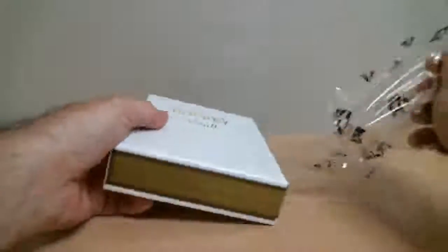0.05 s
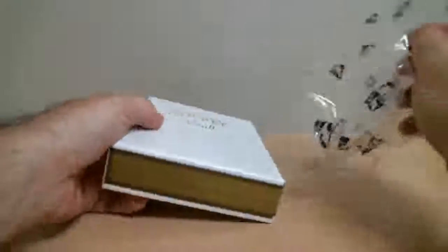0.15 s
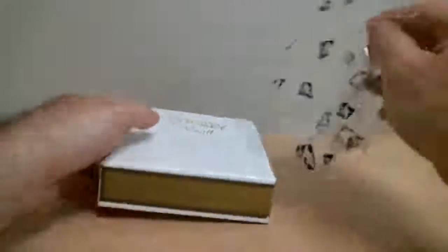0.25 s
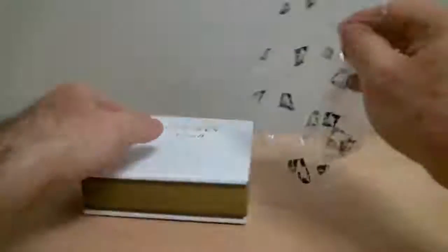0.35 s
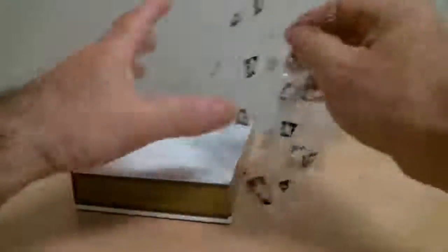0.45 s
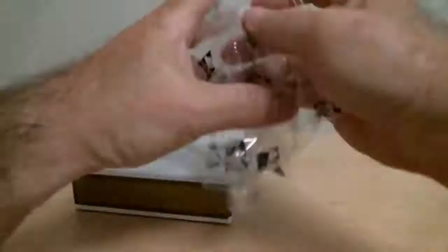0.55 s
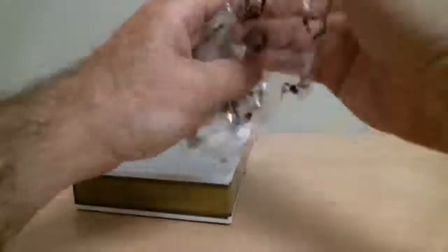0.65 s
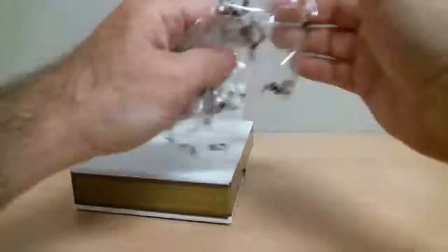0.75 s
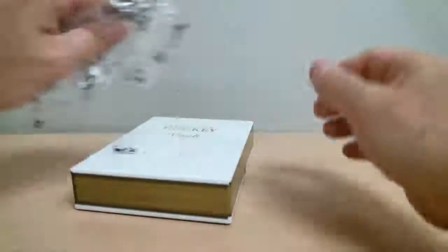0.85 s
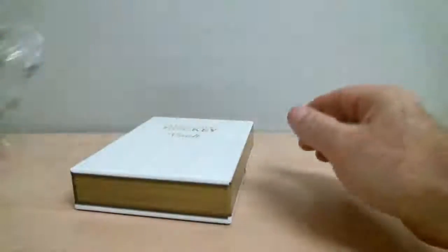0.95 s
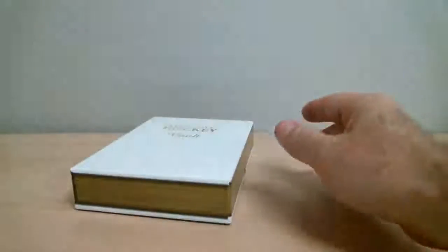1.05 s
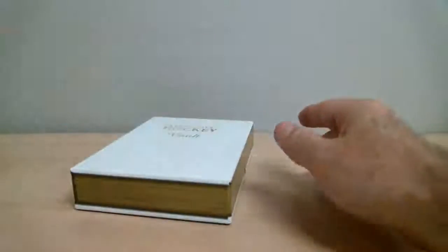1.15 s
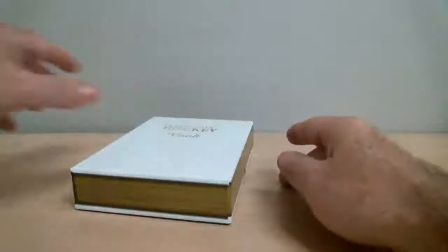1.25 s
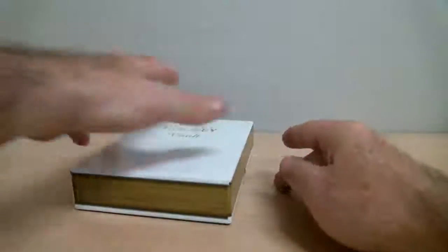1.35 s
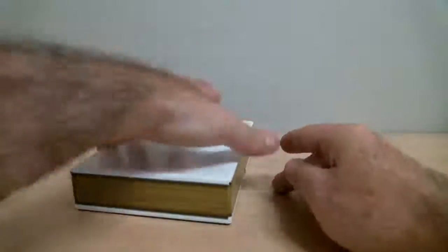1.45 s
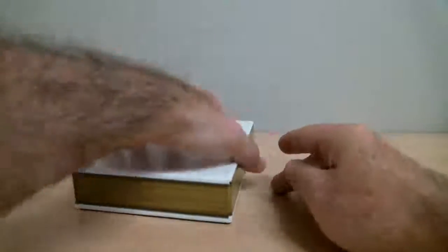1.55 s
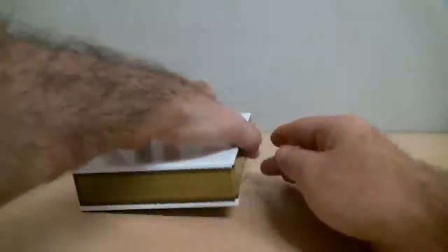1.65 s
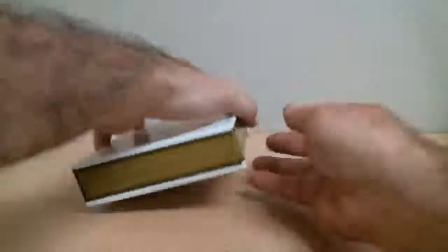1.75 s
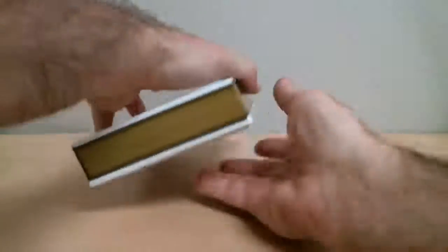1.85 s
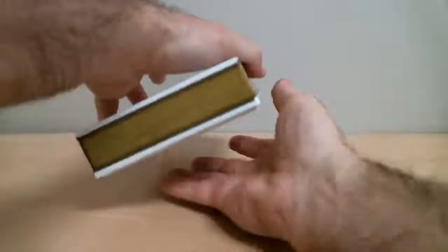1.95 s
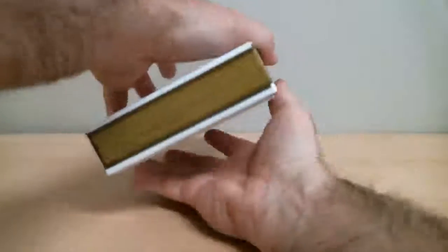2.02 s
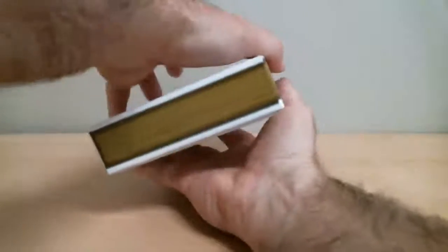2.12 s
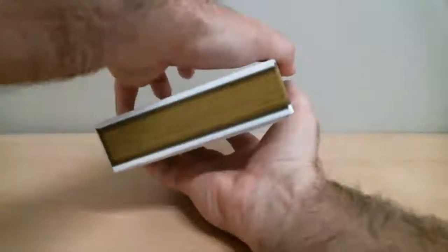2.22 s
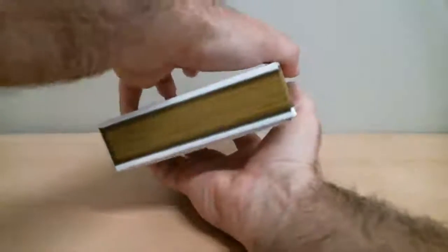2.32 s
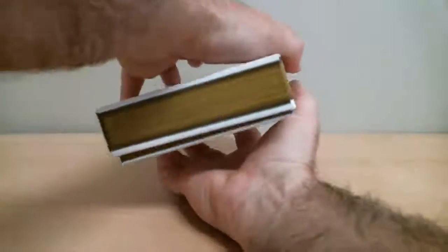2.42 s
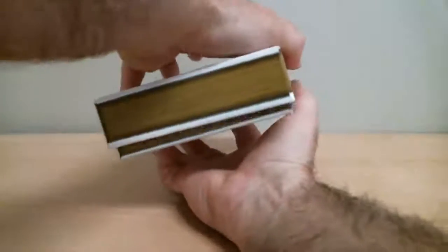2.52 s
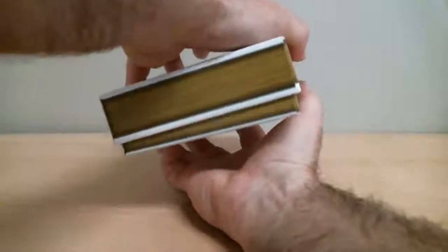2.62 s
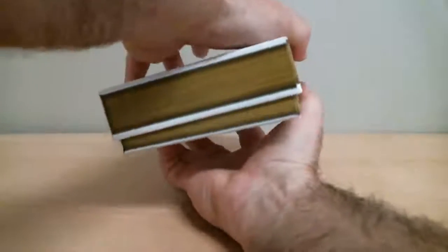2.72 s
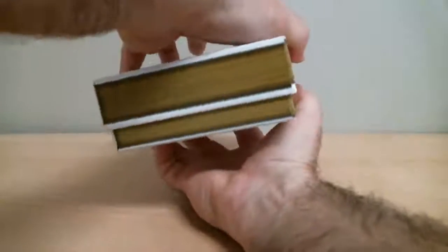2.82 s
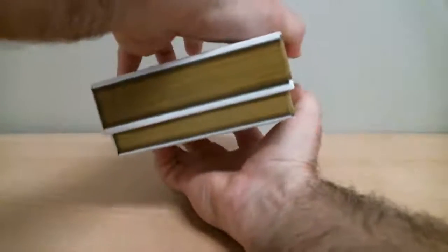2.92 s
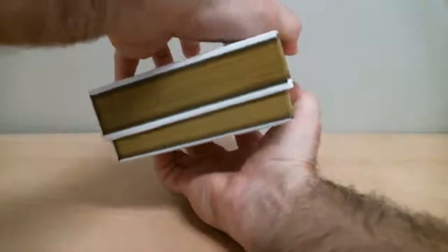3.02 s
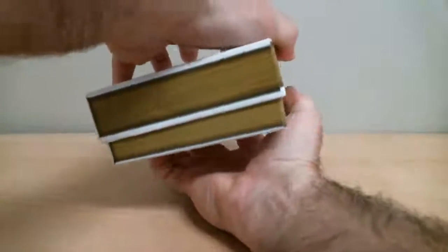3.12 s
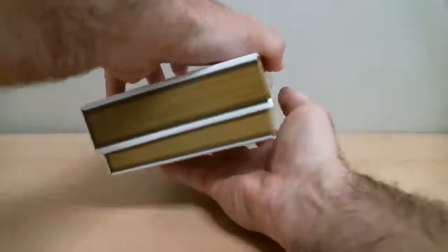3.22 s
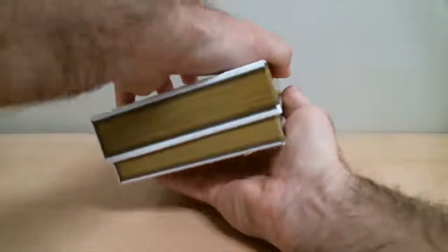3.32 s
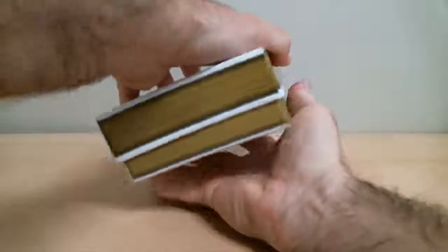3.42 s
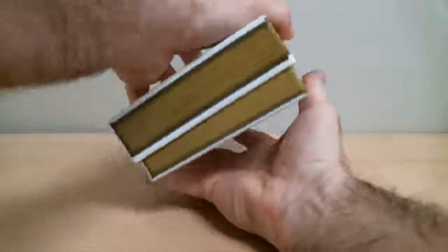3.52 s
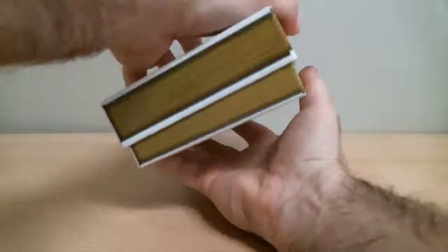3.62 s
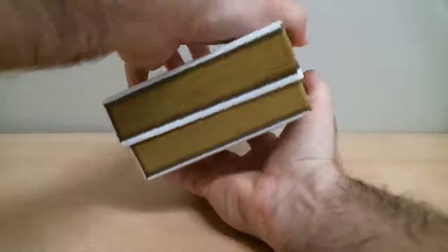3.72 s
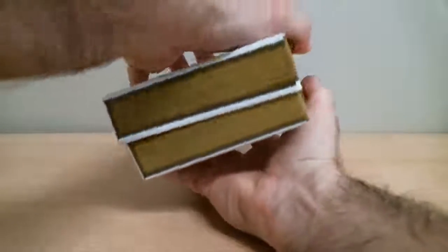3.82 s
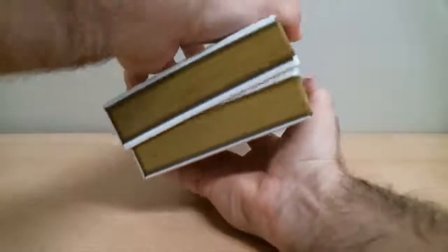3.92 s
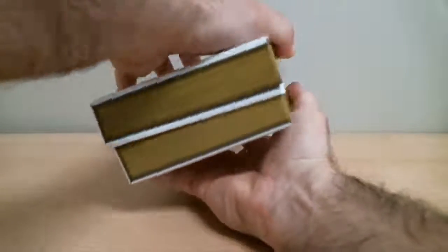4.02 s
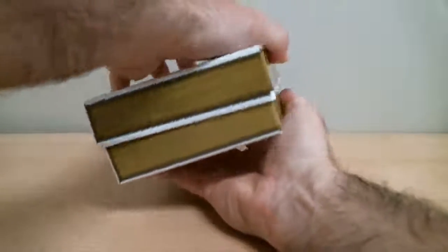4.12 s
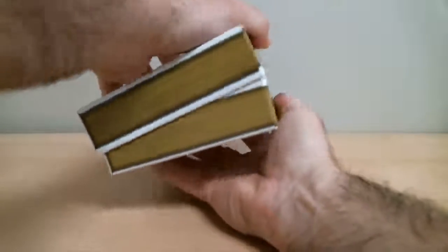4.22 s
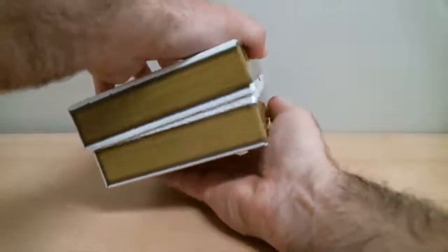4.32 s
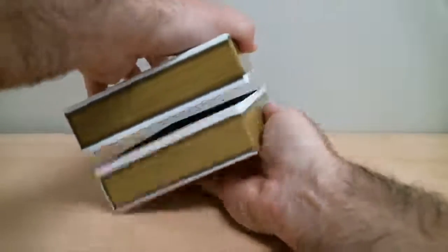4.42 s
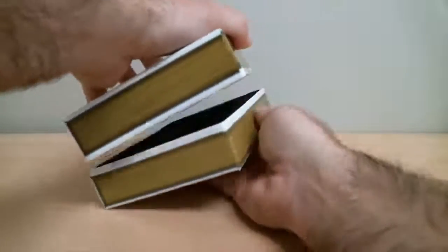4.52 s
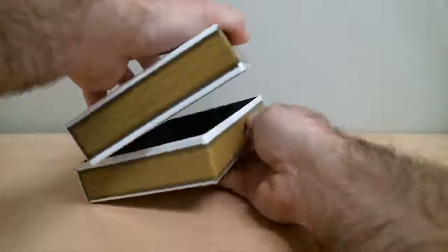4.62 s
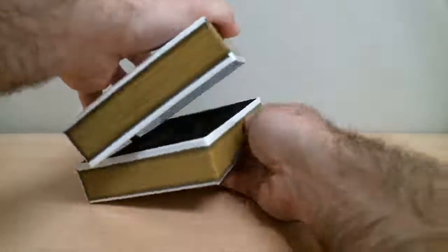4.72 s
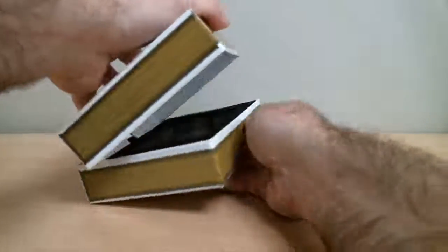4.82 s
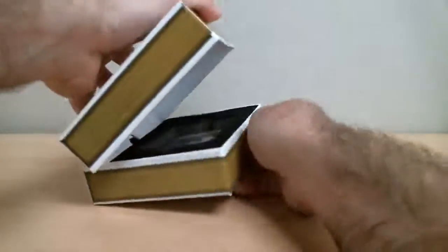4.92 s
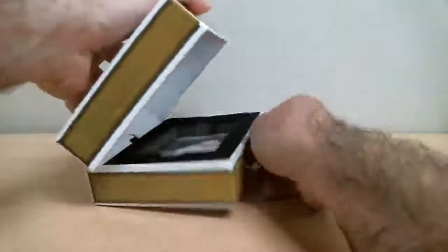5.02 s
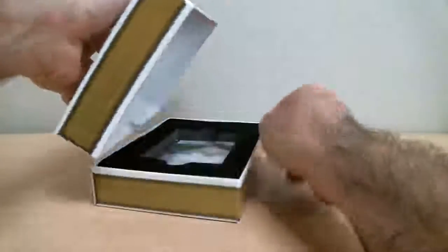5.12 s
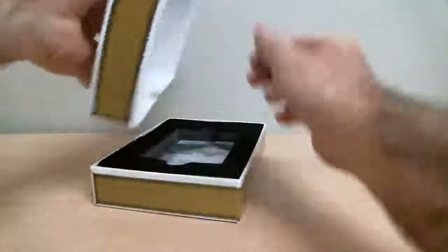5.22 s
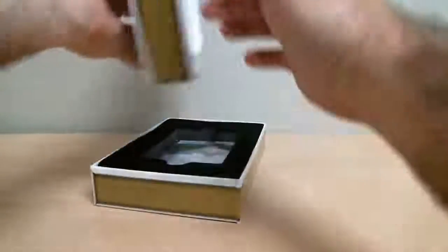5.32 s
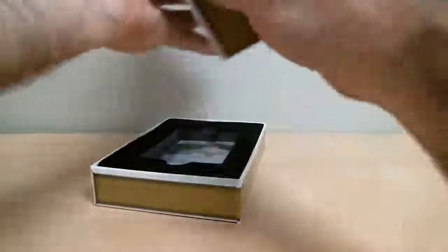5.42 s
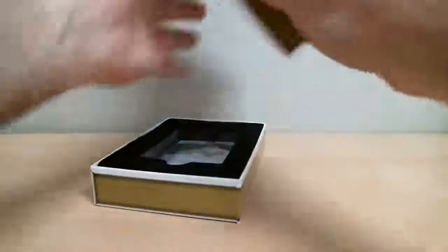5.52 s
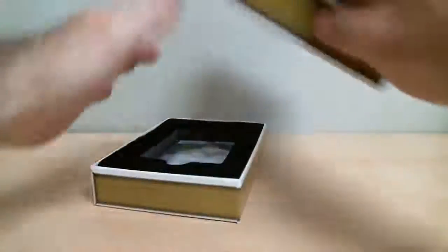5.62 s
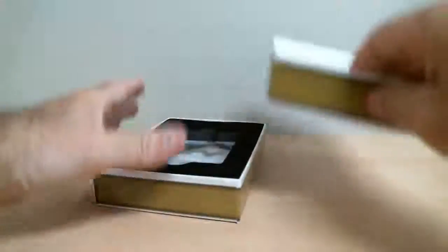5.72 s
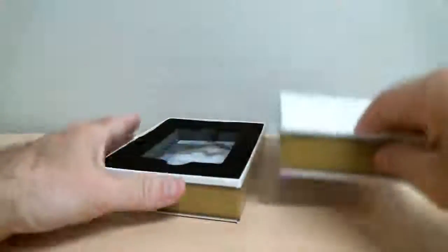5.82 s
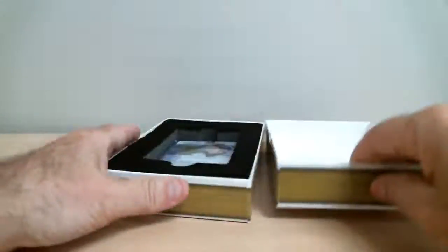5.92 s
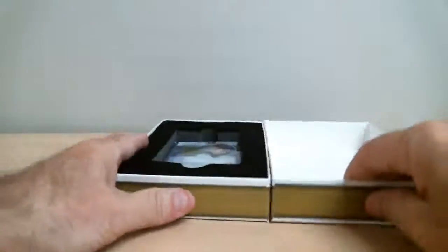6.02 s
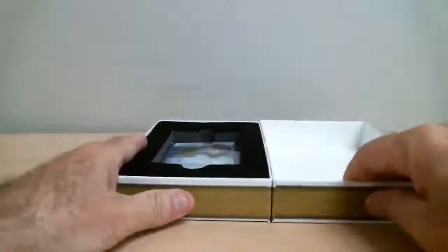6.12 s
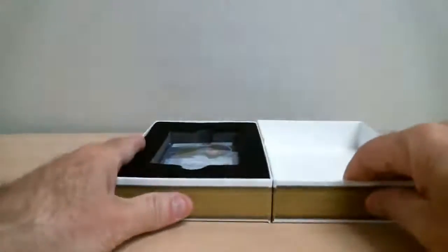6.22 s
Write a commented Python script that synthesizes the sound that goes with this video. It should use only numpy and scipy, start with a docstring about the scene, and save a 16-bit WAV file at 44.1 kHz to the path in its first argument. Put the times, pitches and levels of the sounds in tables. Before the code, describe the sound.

A stiff cardboard box knocks loudly on a wooden table at the start and again at 0.3 seconds. From about 0.5 to 0.7 seconds hands crumple thin plastic wrap with sharp snaps, and it settles in small crackles until just after 1 second. After a lull, soft brushes of skin, low creaks and short scrapes of card on card begin around 1.7 seconds. The lid sticks and slips with small ticks, growing louder from 3.7 seconds, with a cluster of sharp knocks and scrapes between 4.2 and 4.7 seconds. The box knocks down at 5 seconds, a few light ticks follow, and the lid lands with quick knocks and a scrape around 5.9 to 6 seconds. The microphone is close and overloads on the loudest knocks. Faint room air and an appliance hum continue underneath.

```python
"""A stiff cardboard box knocks down on a wooden table, close to one microphone in a room. Hands crumple
its thin plastic wrap, then slide the lid off. Knocks ring the box and table top, the film buckles in
snaps, card sticks and slips on card. Air noise and an appliance's hum lie behind it all, and the
loudest knocks overload the microphone."""
import sys
import numpy as np
from scipy import signal
from scipy.io import wavfile
from scipy.ndimage import uniform_filter1d

SR = 44100
rng = np.random.default_rng(int(sys.argv[2]) if len(sys.argv) > 2 else 0)


def master(y):
    """Save y as 16-bit WAV."""
    cut = np.clip(np.atleast_2d(y).T, -1, 1)
    pcm = np.round(cut * 32767)  # scale
    wavfile.write(sys.argv[1], SR, pcm.astype(np.int16))


N = 276066
T = np.arange(N) / SR

# box against table or lid, crack and thud relative to the blow: start_s, blow_db, crack_db, thud_db
KNOCKS = [(0.0425, 0.5, -6, -21), (0.0559, 4, -28.5, -20.5), (0.313, 7, 1.5, -14), (3.67, -26, 2.5, -62),
          (3.857, -18.5, -8, -35.5), (3.991, -27, -32, -9.5), (4.2, -14, -28.5, -27),
          (4.2243, -14, -3, -26), (4.381, 2, -4, -31.5), (4.422, 8.5, 1.5, -39), (4.446, 2.5, -7, -35),
          (4.465, -9.5, -13, -53.5), (4.553, -15.5, -8, -51), (4.585, -12, -11.5, -34),
          (4.612, -16, -9.5, -37), (5.04, -4, -10.5, -13), (5.044, -8.5, 4.5, -20),
          (5.885, -15.5, -8.5, -16), (5.894, -11, 8, -21), (5.929, -10, -1, -30), (6.012, -28, 6.5, -39.5),
          (6.024, -24, -1.5, -48), (6.034, -22, 1, -43)]
# modes of box and table top: pitch_hz, level_db, t60_s
BOX_MODES = [(121, -21.5, 0.28), (155, -13, 0.44), (212.25, -8.5, 0.071), (300.5, -2, 0.16),
             (389.3, 5, 0.16), (821.5, 0.5, 0.055), (852.3, 6, 0.038), (1497, -9.5, 0.089),
             (1860, -5.5, 0.034), (2370, -9.5, 0.015)]
# the table top's many close modes, blurred into a noisy tail: centre_hz, level_db, t60_s
TABLE_TAIL = [(186, 1.5, 0.15), (374, 2, 0.42), (734, 0, 0.33), (1483.5, -1.5, 0.4), (2750, -14, 0.33),
              (5450, -24, 0.12), (8720, -30.5, 0.12)]
# the walls' ring moves with the grip and with how far the lid is off: time_s, pitch_hz
WALL_RING = [(0.04, 864), (0.32, 833), (2.3, 778), (2.55, 823), (2.75, 753), (3.19, 953), (3.67, 914),
             (3.73, 766), (3.85, 918), (3.98, 857), (4.2, 720), (4.28, 640), (4.38, 945), (4.42, 835),
             (5.04, 829), (5.89, 966), (6.05, 802)]
# spectrum of the room's air: frequency_hz, relative_db
AIR_TONE = [(18, -42), (30, -10.5), (205, -12), (404, -8), (662, -19.5), (735, -27), (815, -17),
            (1060, -21.5), (1560, -20.5), (2630, -35.5), (2990, -29), (15000, -44)]
# partials of the appliance: pitch_hz, level_db
HUM = [(118.4, -67), (199.2, -70), (290.7, -69.5), (355.3, -66.5), (538.3, -78), (829.0, -74.5)]
# film stirred, squeezed, let go, then settling in two small rustles: time_s, level_db
FILM_LEVELS = [(0, -58), (0.06, -55), (0.3, -65), (0.315, -64), (0.445, -57.5), (0.475, -35), (0.486, -23),
               (0.695, -21), (0.722, -48.5), (0.74, -55), (0.905, -55.5), (0.925, -51), (0.97, -36.5),
               (0.995, -57), (1.045, -42), (1.075, -56.5), (1.15, -70.5), (2.3, -75.5)]
# spectrum of the film's crackle: frequency_hz, relative_db
FILM_TONE = [(2500, 2.5), (4300, 0), (7000, -2), (10900, -1.5), (13500, -21.5)]
# skin brushing over the coating: start_s, length_s, level_db
BRUSHES = [(0.201, 0.038, -37.5), (1.848, 0.063, -65), (2.309, 0.036, -55.5), (2.514, 0.074, -57.5),
           (3.087, 0.12, -52.5), (3.406, 0.072, -56.5), (4.09, 0.046, -57.5), (4.74, 0.063, -63.5),
           (4.816, 0.15, -55.5), (5.269, 0.052, -56)]
# hiss of the rubbed coating: centre_hz, width_hz, relative_db
COATING_HISS = [(5500, 2100, 1), (7930, 2200, 12), (10000, 5700, 6.3)]
# single sharp buckles of film and ticks of fingernails: start_s, level_db, centre_hz
SNAPS = [(0.5065, -19, 3660), (0.5331, 5.5, 3970), (0.55, -0.5, 6280), (0.5597, -9, 9700),
         (0.6418, -2.5, 6400), (0.6388, 1, 3400), (0.6758, -5.5, 4000), (0.6854, -7.5, 9300),
         (0.744, -28, 3300), (0.758, -35, 7800), (0.77, -30, 3310), (0.794, -31, 8800),
         (0.834, -29.5, 3720), (0.868, -33.5, 7300), (0.9281, -18, 8050), (0.9444, -20, 9800),
         (2.682, -34, 3150), (2.769, -34, 3120), (3.187, -27, 1890), (3.388, -33, 3220),
         (3.6727, -27.5, 1860), (3.78, -26.5, 2100), (4.929, -45.5, 2200), (5.384, -33, 3130),
         (5.3907, -20, 3140), (5.438, -34.5, 2940)]
# creaks of the released film: start_s, length_s, level_db, ring_hz
CREAKS = [(0.733, 0.054, -45, 3320), (0.834, 0.017, -44.5, 3910)]
# card sliding on card: start_s, length_s, level_db, roughness_db, scratch_hz
STROKES = [(1.298, 0.04, -69.5, 11, 4630), (1.639, 0.05, -65, 11.5, 1520), (1.712, 0.055, -49, -13.5, 2010),
           (2.06, 0.04, -54.5, -10.5, 2600), (2.257, 0.061, -52.5, -12, 3120),
           (2.295, 0.088, -45, -16.5, 1470), (2.388, 0.079, -56, -27, 1420), (2.499, 0.12, -42, -8.5, 2210),
           (2.672, 0.047, -40.5, -9, 3100), (2.722, 0.047, -47.5, -26, 1830),
           (2.771, 0.046, -46.5, -6, 1920), (2.809, 0.065, -47.5, -15.5, 3040),
           (2.92, 0.045, -53, -6.5, 1845), (3.172, 0.036, -47.5, -1.5, 2460),
           (3.389, 0.052, -58.5, -1, 1360), (3.658, 0.038, -36, 0.5, 3180),
           (3.707, 0.057, -41.5, -9.5, 2050), (3.777, 0.018, -44.5, -9, 3040),
           (3.826, 0.044, -35.5, 0, 2880), (3.868, 0.047, -36, -7.5, 2880), (3.923, 0.028, -59, 10, 2130),
           (3.942, 0.056, -34.5, 1, 2300), (4.137, 0.053, -39.5, 8.5, 2490),
           (4.196, 0.057, -28.5, -11, 2850), (4.251, 0.047, -38.5, -26, 1653),
           (4.342, 0.037, -44.5, 3, 1570), (4.436, 0.11, -28.5, -15, 1830), (4.526, 0.1, -28, -10, 1580),
           (4.62, 0.062, -35, -40, 1470), (5.024, 0.015, -36, -12, 1570), (5.421, 0.036, -66.5, 18, 2840),
           (5.566, 0.03, -70, 18, 3005), (5.674, 0.033, -64.5, 10.5, 3290), (5.836, 0.076, -53, 2.5, 1575),
           (5.931, 0.071, -50, 10, 2780), (6.013, 0.029, -26.5, -6.5, 1700), (6.029, 0.069, -42, -23, 1560)]
# wall resonances stirred by rubbing: centre_hz, width_hz, relative_db
WALL_MODES = [(523, 540, -16.5), (700, 79, -2.5), (840, 120, -2), (971.4, 84, -5), (1300, 370, -15)]
# resonances of the hollow box: centre_hz, width_hz, relative_db
HOLLOW_MODES = [(295, 50, 0), (385, 60, -2)]
# fingers shifting their grip: start_s, level_db, ring_hz
GRIPS = [(1.745, -43.5, 370), (1.79, -50.5, 290), (2.062, -52.5, 374), (2.18, -45, 299), (2.254, -46, 334),
         (2.57, -47, 300), (2.67, -47, 370), (2.789, -50, 300), (2.92, -44.5, 283), (3.181, -47, 298),
         (3.387, -42, 290), (3.779, -43, 391), (3.954, -35, 372), (3.985, -32.5, 299), (4.18, -29.5, 306),
         (4.343, -38, 385), (5.485, -52.5, 440), (6.029, -41, 284.5)]


def undb(db):
    return 10 ** (np.asarray(db) / 20)


def unit(x):
    return x / np.sqrt(np.mean(x ** 2))


def band(x, hz, width):
    """One resonance, gain 1 at its centre."""
    return signal.lfilter(*signal.iirpeak(min(hz, .45 * SR), hz / width, fs=SR), x)


def steep_band(x, hz, width):
    return band(band(x, hz, width), hz, width)


def butter(x, order, hz, kind):
    return signal.sosfilt(signal.butter(order, hz, kind, fs=SR, output="sos"), x)


def octave(x, hz):
    """An octave band around hz; rms 1."""
    return unit(butter(x, 3, [hz / np.sqrt(2), hz * np.sqrt(2)], "bandpass"))


def resonate(x, peaks):
    """Sum of (centre_hz, width_hz, relative_db) resonances, neighbours in opposite phase; rms 1."""
    return unit(sum((-1) ** k * undb(db) * steep_band(x, hz, width)
                    for k, (hz, width, db) in enumerate(peaks)))


def walk(rate):
    """Random levels held 1 / rate s and slewed twice; spread near 1."""
    hold = int(SR / rate)
    steps = np.repeat(rng.standard_normal(N // hold + 1), hold)
    return 1.3 * uniform_filter1d(uniform_filter1d(steps, hold), hold)[:N]


def grit(rate, spread_db):
    """Random clicks, rate a second, some much larger than the rest."""
    where, sign, height = rng.random((3, N))
    return (where < rate / SR) * np.sign(sign - .5) * undb(spread_db * np.minimum(-np.log(height), 4))


def add(out, start, sound):
    i = int(start * SR)
    out[i:i + len(sound)] += sound[:len(out) - i]


def touch(start, length, db):
    """The samples of one touch and its pressure, which spills half a length to either side."""
    part = slice(int((start - .5 * length) * SR), int((start + 1.5 * length) * SR))
    return part, undb(db) * np.sin(np.pi * np.linspace(0, 1, part.stop - part.start)) ** 4


def wall_shift(time, rest_hz=840):
    """Pitch of the walls relative to rest."""
    return np.interp(time, *np.transpose(WALL_RING)) / rest_hz


def knocks():
    """Each blow rings the modes, slaps and cracks at the contact and leaves the table rumbling."""
    out, t = np.zeros(N), T[:SR // 3]
    hz, db, t60 = np.transpose(BOX_MODES)[:, :, None]
    chatter = undb(2 * walk(90))  # the box rattles on the table while the tail dies
    onset, ending = np.clip(t / 0.00079, 0, 1), np.exp(-(t / 0.22) ** 4)
    for start, blow_db, crack_db, thud_db in KNOCKS:
        share, detune = rng.standard_normal((2, len(BOX_MODES), 1))
        pitch = hz * np.where((hz > 700) & (hz < 1300), wall_shift(start), 1) * (1 + 0.0068 * detune)
        # a harder contact lifts the upper modes, a heavier one the lowest
        hard_db = .5 * (crack_db + 4.5)
        heavy_db = (thud_db + 14) * np.where(hz < 220, 1, 0.54 * (hz < 450))
        mode_db = db + np.where(hz > 1300, hard_db, heavy_db) + 2 * share
        ring = (undb(mode_db - 60 * t / t60) * np.sin(2 * np.pi * pitch * t)).sum(0)
        noise = rng.standard_normal(len(t))
        slap = octave(noise, 810 * wall_shift(start)) * np.exp(-t / 0.0016)
        crack = (octave(noise, 1897) * np.exp(-t / 0.0045)
                 + 0.2 * octave(noise, 5200) * np.exp(-t / 0.0034)
                 + 0.2 * octave(noise, 7500) * np.exp(-t / 0.0025))
        tail = 0
        for centre, band_db, band_t60 in TABLE_TAIL:
            band_db += hard_db * max(np.log2(centre / 800), 0)
            band_db += 0.91 * (thud_db + 18.5) * (centre < 220)
            band_db += 0.24 * (thud_db + 22) * (220 < centre < 450)
            tail += undb(band_db - 60 * t / band_t60) * octave(rng.standard_normal(len(t)), centre)
        tail *= undb(-25 + 0.14 * blow_db) * onset * np.resize(chatter[int(start * SR):], len(t))
        knock = 0.27 * ring + 1.5 * slap + undb(crack_db - 4) * crack + tail
        add(out, start, undb(blow_db) * ending * knock)
    return butter(out, 4, [115, 10500], "bandpass")


def room_tone(air_db=-60.5):
    """Third-octave bands of air noise, each flickering on its own, and an appliance's wavering hum."""
    tone_hz, tone_db = np.transpose(AIR_TONE)
    air = hum = 0
    for centre in 40 * 2 ** np.arange(0, 8.6, 1 / 3):
        noise = steep_band(rng.standard_normal(N), centre, centre / 3)
        air += undb(np.interp(np.log(centre), np.log(tone_hz), tone_db) + 0.5 * walk(10)) * noise
    for hz, db in HUM:
        level = undb(db + 5.5 + 0.84 * walk(17))
        pitch = hz * (1 + 0.013 * walk(33))
        hum += level * np.sin(2 * np.pi * np.cumsum(pitch) / SR)
    return undb(air_db) * unit(air) + hum


def film(let_go_s=0.72, settled_s=0.91):
    """Creases jump all over the sheet: each size clicks in its own band, over a deeper crumple."""
    tone_hz, tone_db = np.transpose(FILM_TONE)
    crackle, cluster = 0, walk(200)
    for centre in 2600 * 2 ** np.arange(0, 2.5, .4):
        clicks = unit(grit(2800, 4.1) * undb(2 * walk(150) + 1.7 * cluster))
        gain = undb(np.interp(np.log(centre), np.log(tone_hz), tone_db))
        crackle += gain * steep_band(clicks, centre, .5 * centre)
    folds = grit(3500, 3.5) * undb(2.5 * walk(120))
    crumple = resonate(folds, [(318, 170, -1), (820, 400, 2.5), (1570, 900, -1)])
    # once let go, the film creeps back in separate crackles
    gaps = undb(3 * walk(69.8) * (T > let_go_s) * (T < settled_s))
    level = undb(np.interp(T, *np.transpose(FILM_LEVELS), left=-200, right=-200))
    return level * gaps * unit(crackle) + undb(-6) * level ** 1.018 * crumple


def brushes(hiss, fibres):
    """Skin brushes the coating: hiss with a faint scratch."""
    out = np.zeros(N)
    for start, length, db in BRUSHES:
        part, pressure = touch(start, length, db)
        out[part] += pressure * (hiss[part] + undb(-11.5) * resonate(fibres[part], [(2970, 2500, 0)]))
    return out


def snaps():
    """Film buckles and nails tick in about a millisecond, each with its own colour and a short rattle."""
    out, t = np.zeros(N), T[:SR // 20]
    for start, db, hz in SNAPS:
        burst = rng.standard_normal(len(t)) * (np.exp(-t / 0.00021) + 0.1596 * np.exp(-t / 0.0028))
        width = hz * np.clip(0.5 + 0.34 * db, .3, 1.5)  # harder buckles are broader
        splash = 0.05 * np.std(burst) * (octave(burst, 8000) + octave(burst, 3000))
        tick = steep_band(burst, hz, width) + splash
        add(out, start, undb(db) * tick / np.abs(tick).max())
    return out


def film_creaks(grains):
    """The released film creaks on a narrow ring."""
    out = np.zeros(N)
    for start, length, db, hz in CREAKS:
        part, pressure = touch(start, length, db)
        out[part] += pressure * resonate(grains[part], [(hz, 0.43 * hz, 0)])
    return out


def lid_strokes(slips, grains, fibres, hiss):
    """Card sticks and slips: the hollow box and its walls shake, fibres scratch, the coating hisses."""
    out, hollow = np.zeros(N), resonate(slips, HOLLOW_MODES)
    for start, length, db, rough_db, hz in STROKES:
        part, pressure = touch(start, length, db)
        # a firmer stroke rasps over a broader range
        rasp_db = np.clip(-4 + .6 * (db + rough_db + 50), -15, 2)
        rasp = undb(rasp_db) * resonate(fibres[part], [(2600, 3400, 0)])
        scratch = resonate(fibres[part], [(hz, (.34 + .013 * rasp_db) * hz, 0)])
        surface = unit(scratch + rasp) + undb(-11.5) * hiss[part]
        walls = resonate(grains[part], np.array(WALL_MODES) * [wall_shift(start + length / 2), 1, 1])
        out[part] += pressure * (walls + undb(-10) * hollow[part] + undb(rough_db) * surface)
    return out


def grips(slips, length_s=0.046, width_hz=70):
    """Shifting fingers squeeze a low creak from the hollow box."""
    out = np.zeros(N)
    for start, db, hz in GRIPS:
        part, pressure = touch(start, length_s, db)
        out[part] += pressure * resonate(slips[part], [(hz, width_hz, 0)])
    return out


def rubbing():
    """Friction clicks, coarse to fine, swell with one shared judder and drive all the rubbed sounds."""
    judder = walk(45)
    slips = grit(930, 2.1) * undb(2 * judder)
    grains = grit(2400, 5.1) * undb(0.83 * judder)
    fibres = unit(grit(5000, 3.6) * undb(1.8 * judder + 2.2 * walk(110)))
    hiss = resonate(grit(22000, 1.1) * undb(1.2 * judder + 1.3 * walk(90)), COATING_HISS)
    return (brushes(hiss, fibres) + film_creaks(grains)
            + lid_strokes(slips, grains, fibres, hiss) + grips(slips))


def echoed(x, level_db=-15.5, t60_s=0.22, centre_hz=2490):
    """Table and wall send a short, duller smear back to the microphone."""
    t = T[:SR // 4]
    tail = band(rng.standard_normal(len(t)), centre_hz, 2 * centre_hz) * undb(-60 * t / t60_s)
    return x + undb(level_db) * signal.fftconvolve(x, tail / np.linalg.norm(tail))[:N]


def scene():
    """The table and the room behind it, in mono."""
    return (knocks() + film() + echoed(snaps() + rubbing()) + room_tone())[None]


def record(dry):
    """The microphone loses the highest treble and overloads on the knocks; deep bass and top are cut."""
    overloaded = np.clip(butter(dry, 3, 13000, "lowpass"), -1, 1)
    thin = butter(overloaded, 2, 55, "highpass")
    top_cut = signal.ellip(10, .2, 80, 16100, fs=SR, output="sos")
    return np.clip(signal.sosfilt(top_cut, thin), -1, 1)


dry = scene()
out = record(dry)
master(out)
```